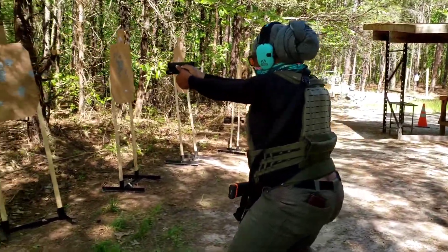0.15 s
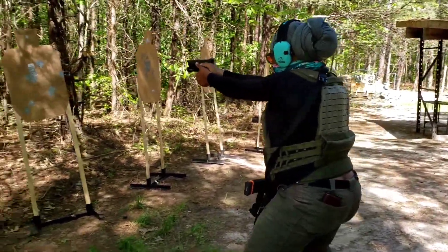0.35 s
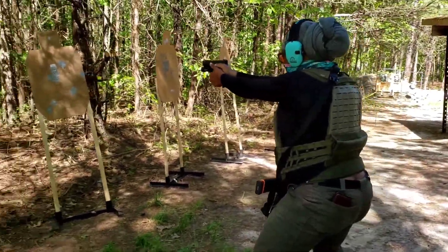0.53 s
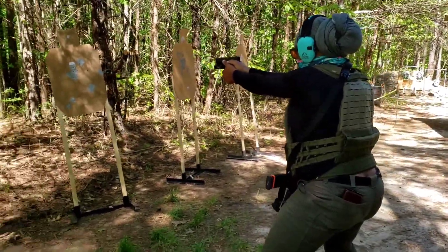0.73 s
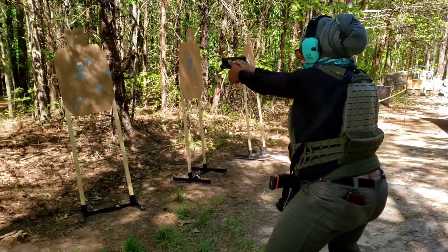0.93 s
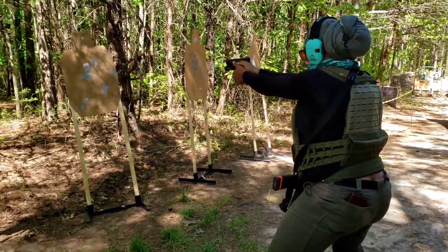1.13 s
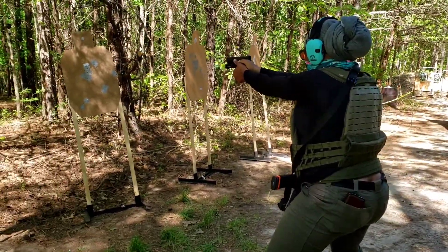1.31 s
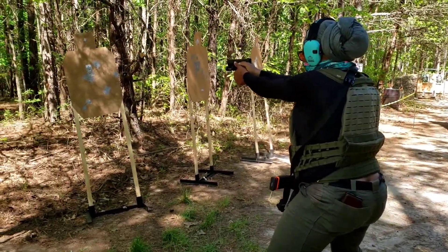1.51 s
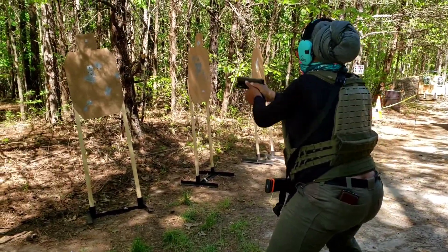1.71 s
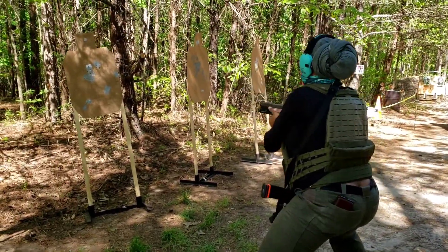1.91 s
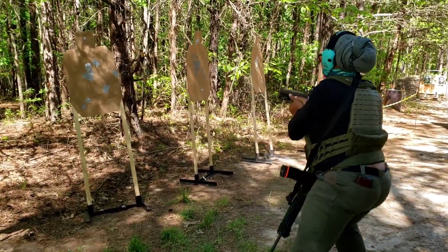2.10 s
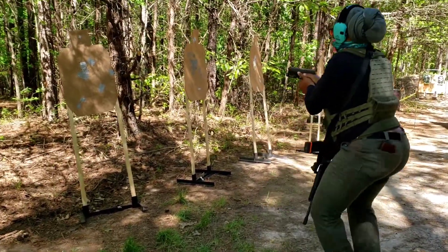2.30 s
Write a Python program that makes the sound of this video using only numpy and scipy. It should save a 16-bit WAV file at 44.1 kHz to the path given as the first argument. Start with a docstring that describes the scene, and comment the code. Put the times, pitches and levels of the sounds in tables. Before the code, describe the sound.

Two pistol shots, about a second apart, crack loudly at an outdoor woodland range, heard from a few steps behind the shooter. Trees scatter each blast into a brief fading echo; the overloaded microphone is lightly bumped.

```python
"""Two pistol shots at a woodland range

Heard from a few steps behind the shooter, in still air. Each muzzle blast is a pressure spike with crackle that
comes back off the ground and the nearby stands, and swings the overloaded microphone at a low pitch.
Trees scatter it into noise and single echoes, a tail that darkens as it fades.
Soft handling bumps and rumble are decaying tones and low noise; gear ticks and rustles are shaped noise."""
import sys
import numpy as np
from scipy import signal
from scipy.fft import rfft, irfft
from scipy.io import wavfile

SR = 44100
rng = np.random.default_rng(int(sys.argv[2]) if len(sys.argv) > 2 else 0)


def master_out(mix):
    """Clip the mix to full scale and print it as 16-bit PCM to the path in sys.argv[1]."""
    frames = np.transpose(np.atleast_2d(mix))
    ceiling = np.clip(frames, -1, 1)
    pcm = np.round(ceiling * 32767).astype(np.int16)
    wavfile.write(sys.argv[1], SR, pcm)


N = 103635
T = np.arange(N) / SR  # seconds
HZ = np.maximum(np.arange(N // 2 + 1) * SR / N, 1)  # frequency grid

# Levels are relative gains within each layer; a positive pan_db is louder on the left.
# Spectra are levels per Hz, drawn between the listed pitches.

# still air: pitch_hz, level_db
AIR_SPECTRUM = [(25, -24), (120, -11), (300, -4), (720, 0), (1300, -28), (3500, -39.5), (7500, -42.5),
                (10500, -34), (15500, -37.5)]
AIR_DB = -52.5
# how alike left and right are in all stereo noise: pitch_hz, likeness (0 unrelated, 1 identical)
STEREO_LIKENESS = [(60, 1), (300, 0.66), (700, 0.55), (1400, 0), (3000, 0.25), (12000, 0)]

# bumps on the microphone, before dulling: start_s, level_db, pitch_hz, t60_s
BUMPS = [(0.015, -42, 93, 0.022), (0.191, -44, 50.5, 0.021), (.765, -58.5, 69.7, .04),
         (0.984, -56, 64.6, 0.043), (2.052, -49, 70.3, 0.02), (2.099, -51.5, 170, .04),
         (2.131, -51, 75, 0.035), (2.181, -49.5, 289, 0.088), (2.234, -59, 81.1, 0.035)]
# rumbles as the microphone is moved: start_s, length_s, level_db
RUMBLES = [(.06, 0.076, -47.5), (.13, .12, -41), (2.025, 0.16, -43)]
# colour of the rumble: pitch_hz, level_db
RUMBLE_SPECTRUM = [(30, -4), (90, 3), (170, -1.5), (300, -11), (700, -37), (3000, -72.5)]
# small ticks of gear: start_s, level_db, pan_db
TICKS = [(0.143, -65.5, 0), (1.873, -65, -10), (2.019, -58, 2), (2.13, -66, 10)]
TICK_DECAY_S = 0.0026
# rustles of gear: start_s, length_s, level_db
RUSTLES = [(1.04, .05, -84), (1.84, 0.056, -82), (1.99, 0.1, -77), (2.12, 0.086, -64.5)]
# colour of rustles and ticks: pitch_hz, level_db
GEAR_SPECTRUM = [(300, 2), (2800, -5.5), (4500, -23), (7800, -16), (10500, -14), (15500, -15)]
RUSTLE_PAN_DB = 5

# the shots: start_s, level_db, thump_db, ring_db, first_crack_db, lead_in_s
SHOTS = [(.2240, 0.5, -11, -1, 7, 0.0012), (1.1790, 0, -14, -2.5, 0, 0.0043)]
# paths of the blast, direct first: delay_ms, level_db, pan_db, crackle_db, ring_db
PATHS = [(0, -0.5, -1.5, -5.5, -9), (1.6, 0.5, 3.5, 0, -6), (3.997, 1, -1.5, -2, 0), (10.422, -3, 4, 6, 3),
         (18.77, -24.5, 5.5, -7.5, -6.5), (22.87, -9.5, 12.5, 0, 2.5), (25.78, -3, -1, -5, -14)]
SPIKE_S, SPIKE_TOP_HZ, SPIKE_DB = .00075, 2610, -4
# what the blast sets ringing close by: pitch_hz, level_db, t60_s
RINGS = [(864, -16.5, 0.031), (1054, -22.5, .05), (1370, -18.5, .04)]
RING_PAN_DB = 8.5
# harsh crackle of the blast: pitch_hz, left_db, right_db
CRACKLE_SPECTRUM = [(88, -12.5, -14), (148, 12.5, 1), (290, -0.5, -4), (700, -3, 6), (1420, -2.5, -12.5),
                    (3038, -9.5, -15), (5960, -26.5, -12.5), (8050, -46.5, -24), (10500, -23.5, -8),
                    (15000, -33, -11.5)]
CRACKLE_DB, CRACKLE_DECAY_S = -3, .0022
CRACK_DECAY_S = .0012
LEAD_DB = -7  # relative to the crackle
THUMP_HZ, THUMP_PEAK_S, THUMP_SHARPNESS = 54, 0.016, 3.7
THUMP_LAG_S, THUMP_LEFT_LEAD_S, THUMP_PAN_DB = .0105, 0.0062, -6.5
RIGHT_LAG_S = .00008

# colour of the scatter from the trees: pitch_hz, left_db, right_db
WOOD_SPECTRUM = [(25, -23, -20.5), (60, -14.5, -18), (100.35, -16, -16), (180, -17, -18.5),
                 (332, -9, -11.5), (487, -3.5, -4), (766, 5.5, 2), (1130, -2.5, -7.5), (1435, -1, -5),
                 (1690, -6, -15), (2200, -10.5, -14), (2850, -9.5, -13.5), (4192, -21.5, -16),
                 (7020, -29, -14.5), (7800, -34.5, -17), (9500, -24, -11), (11300, -27.5, -9.5),
                 (15300, -31, -13.5)]
WOOD_DB, SPREAD_S, SPREAD_DB_PER_DECADE = -2, 0.094, 38
# absorption on the way: pitch_hz, loss_db_per_s
ABSORPTION = [(50, 70.5), (150, 25), (350, 7.5), (750, 5), (1400, 12), (2000, 20.5), (3000, 37), (5200, 65),
              (7500, 89), (10000, 104.5), (15000, 119)]
# time constant of the scatter's build-up, shortest in the top treble: pitch_hz, rise_s
BUILD_UP = [(150, 0.01), (700, 0.017), (1500, .025), (5000, 0.018), (12000, .005)]
# single echoes within the scatter; share is of the power
TRUNKS_PER_S, TRUNK_SHARE, TRUNK_SPREAD_DB = 900, 0.22, 0.5
FLUTTER_DB, FLUTTER_HZ = .6, 45  # RMS depth, and where the wander's spectrum rolls off

CEILING = .98
CUTOFF_HZ = 15800
NOTCH_HZ, NOTCH_WIDTH_HZ, NOTCH_DEPTH = 7800, 1000, .7  # depth 1 would be a full null


def from_db(db):
    """Decibels to gain."""
    return 10 ** (np.asarray(db) / 20)


def panned(db):
    """Left and right gains for a level difference."""
    return from_db([[db / 2], [-db / 2]])


def at_hz(points):
    """Each column of a table over the frequency grid, straight lines on a log pitch scale."""
    hz, *columns = np.transpose(points)
    return np.array([np.interp(np.log(HZ), np.log(hz), column) for column in columns])


def coloured(x, spectrum):
    """Gives a steady noise its spectrum."""
    return irfft(rfft(x) * from_db(at_hz(spectrum)), N)


def paired(two):
    """Two unrelated noises as the microphone pair hears them: alike in the bass, apart in the treble."""
    mid, side = rfft(two)
    alike = at_hz(STEREO_LIKENESS)
    shared = np.sqrt((1 + alike) / 2) * mid
    opposed = np.sqrt((1 - alike) / 2) * side * [[1], [-1]]
    return irfft(shared + opposed, N)


def noise(spectrum):
    """Steady stereo noise."""
    return coloured(paired(rng.standard_normal((2, N))), spectrum)


def dying(start, tau):
    """A sudden start and an exponential fall."""
    return (T >= start) * np.exp(-np.maximum(T - start, 0) / tau)


def ring(start, hz, t60):
    """A struck resonance: a sine that falls by 60 dB in t60."""
    return dying(start, t60 / np.log(1000)) * np.sin(2 * np.pi * hz * (T - start))


def low_pass(x, hz):
    """A gentle causal low-pass."""
    return signal.sosfilt(signal.butter(2, hz, fs=SR, output="sos"), x)


def swells(rows):
    """Arched rises and falls of level."""
    return sum(from_db(db) * np.sin(np.pi * np.clip((T - s) / length, 0, 1)) for s, length, db in rows)


def flutter():
    """A gain that wanders at random."""
    slow = irfft(rfft(rng.standard_normal(N)) / (1 + (HZ / FLUTTER_HZ) ** 2) ** 2, N)
    return from_db(FLUTTER_DB * slow / slow.std())


def still_air():
    """The quiet of the range, a steady coloured noise."""
    return from_db(AIR_DB) * noise(AIR_SPECTRUM)


def handling():
    """Knocks ring dully and movement rumbles on the microphone; gear rustles and ticks as noise."""
    knocks = sum(from_db(db) * ring(s, hz, t60) for s, db, hz, t60 in BUMPS)
    bumps = low_pass(knocks, hz=300)
    rumble = swells(RUMBLES) * noise(RUMBLE_SPECTRUM)
    ticks = sum(panned(pan_db) * from_db(db) * dying(s, TICK_DECAY_S) for s, db, pan_db in TICKS)
    rustles = panned(RUSTLE_PAN_DB) * swells(RUSTLES) * flutter()
    return bumps + rumble + (rustles + ticks) * noise(GEAR_SPECTRUM)


def blast(start, ring_db, crack_db, lead_s):
    """A crack, then a pressure spike with its suction phase by each path, with crackle and a short ring."""
    # a hiss swells just ahead of the crack
    lead = from_db(LEAD_DB) * np.clip(1 + (T - start) / lead_s, 0, 1) * (T < start)
    crack = from_db(crack_db) * dying(start, CRACK_DECAY_S)
    out = from_db(CRACKLE_DB) * noise(CRACKLE_SPECTRUM) * (lead + crack)
    crackle = from_db(CRACKLE_DB) * noise(CRACKLE_SPECTRUM)
    for delay_ms, db, pan_db, crackle_db, path_ring_db in PATHS:
        s = start + delay_ms / 1000
        pulse = (1 - (T - s) / SPIKE_S) * dying(s, SPIKE_S)  # pressure, then suction
        spike = -from_db(SPIKE_DB + db) * low_pass(pulse, SPIKE_TOP_HZ)
        rings = sum(from_db(level + ring_db + path_ring_db) * ring(s, hz, t60) for hz, level, t60 in RINGS)
        out = out + panned(pan_db) * spike
        out = out + from_db(crackle_db) * crackle * dying(s, CRACKLE_DECAY_S)
        out = out - panned(RING_PAN_DB) * rings
    return out


def thump(start):
    """The overloaded microphone swings slowly after the pressure wave, its left side ahead in phase."""
    age = np.maximum(T - start, 0) / THUMP_PEAK_S
    swell = (age * np.exp(1 - age)) ** THUMP_SHARPNESS
    lag = THUMP_LAG_S - np.array([[THUMP_LEFT_LEAD_S], [0]])
    return panned(THUMP_PAN_DB) * swell * np.sin(2 * np.pi * THUMP_HZ * (T - start - lag))


def wood(start):
    """Echoes from trunks and leaves weaken with distance; absorption spares the middle, the treble goes first."""
    age = np.maximum(T - start, 0)
    hits = rng.random((2, N)) < TRUNKS_PER_S / SR
    strengths = from_db(rng.normal(0, TRUNK_SPREAD_DB, (2, N)))
    trunks = hits * rng.choice([-1, 1], (2, N)) * strengths
    leaves = rng.standard_normal((2, N))
    scatter = np.sqrt(TRUNK_SHARE) * trunks / trunks.std() + np.sqrt(1 - TRUNK_SHARE) * leaves
    spectrum = rfft(coloured(paired(scatter), WOOD_SPECTRUM))
    rise_s, loss_db_per_s = at_hz(BUILD_UP)[0], at_hz(ABSORPTION)[0]
    # overlapping bands, each with its own rise and fall
    centres = np.geomspace(40, CUTOFF_HZ, 20)
    out = 0
    for hz, pick in zip(centres, np.eye(len(centres))):
        band = irfft(spectrum * np.interp(np.log(HZ), np.log(centres), pick), N)
        rise = 1 - np.exp(-age / np.interp(hz, HZ, rise_s))
        fall = from_db(-np.interp(hz, HZ, loss_db_per_s) * age)
        out = out + band * rise * fall
    return out * from_db(WOOD_DB - SPREAD_DB_PER_DECADE * np.log10(1 + age / SPREAD_S))


def lagged(x):
    """The sound reaches the right port a little later than the left; a phase slope delays it."""
    right = irfft(rfft(x[1]) * np.exp(-2j * np.pi * HZ * RIGHT_LAG_S), N)
    return np.array([x[0], right])


def scene():
    """Both shots over the quiet of the range."""
    quiet = still_air() + handling()
    shots = 0
    for s, db, thump_db, ring_db, crack_db, lead_s in SHOTS:
        shot = blast(s, ring_db, crack_db, lead_s) + from_db(thump_db) * thump(s) + wood(s) * flutter()
        shots = shots + from_db(db) * shot
    return quiet + lagged(shots)


def record(dry):
    """Peaks are rounded by overload, the treble has a narrow dip, the top is cut."""
    x = CEILING * np.tanh(dry / CEILING)
    notched = signal.lfilter(*signal.iirnotch(NOTCH_HZ, NOTCH_HZ / NOTCH_WIDTH_HZ, fs=SR), x)
    dipped = x + NOTCH_DEPTH * (notched - x)
    top_cut = signal.ellip(10, .1, 80, CUTOFF_HZ, fs=SR, output="sos")  # steep low-pass
    return signal.sosfilt(top_cut, dipped)


dry = scene()
out = record(dry)
master_out(out)
```